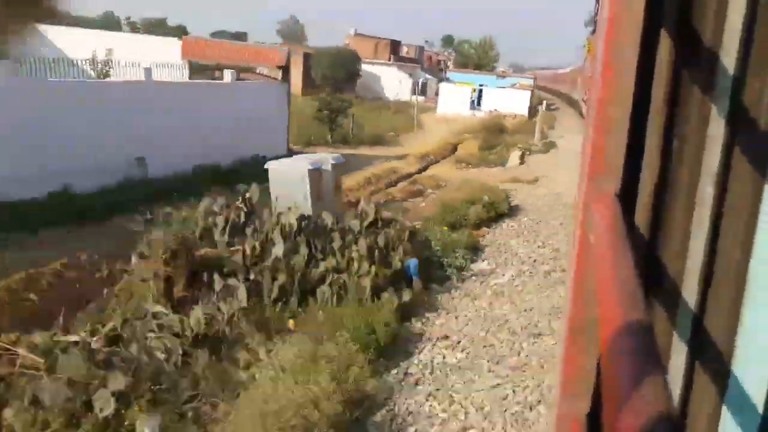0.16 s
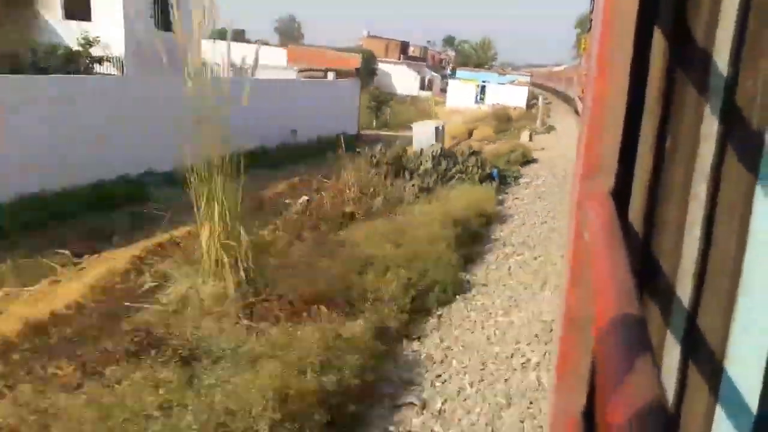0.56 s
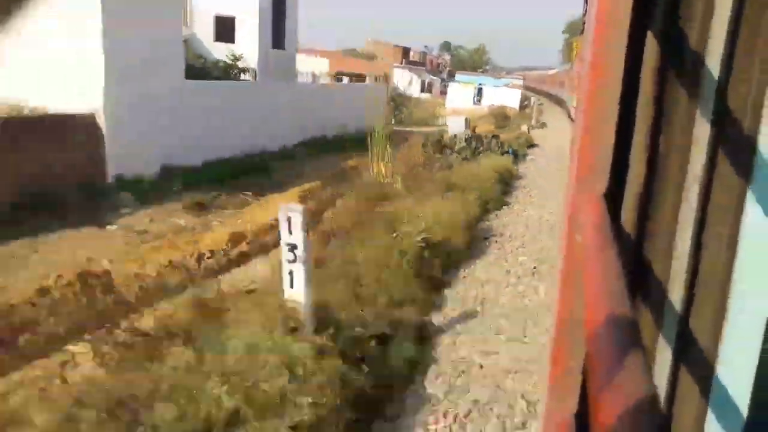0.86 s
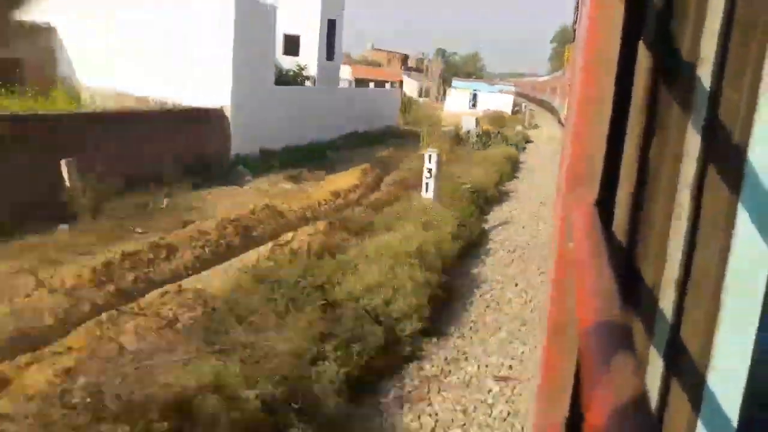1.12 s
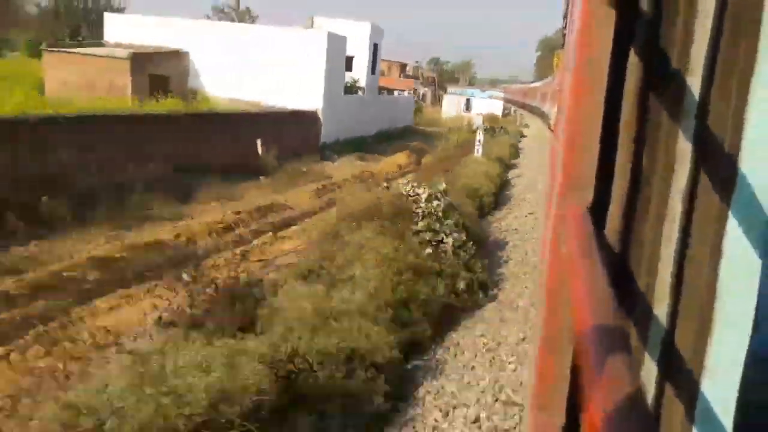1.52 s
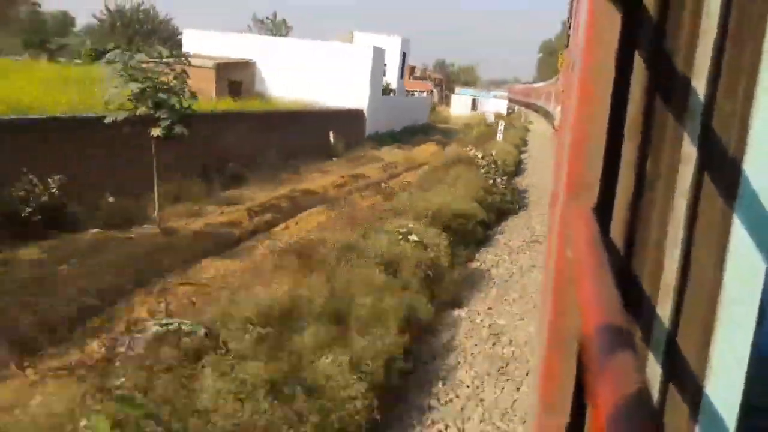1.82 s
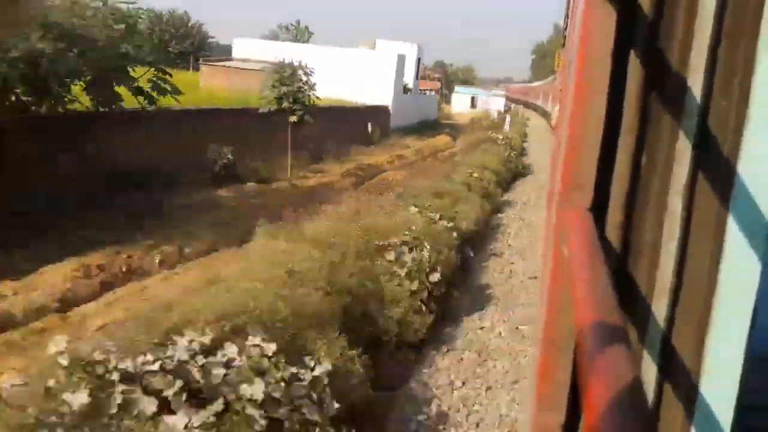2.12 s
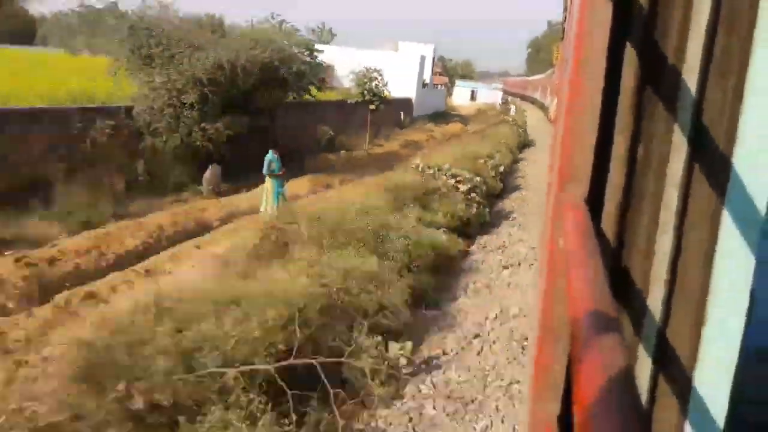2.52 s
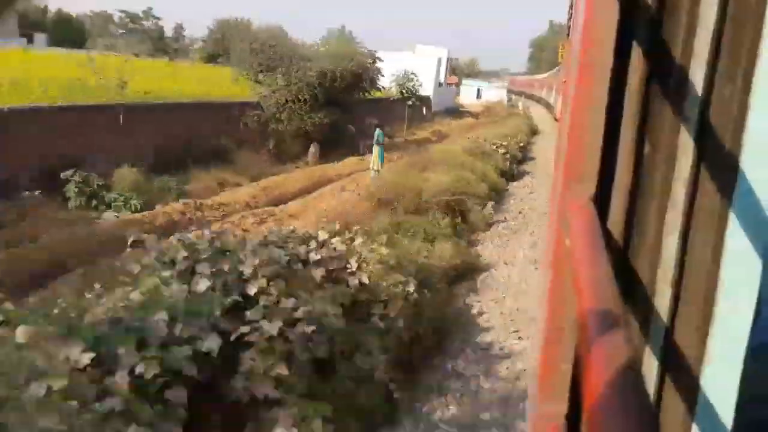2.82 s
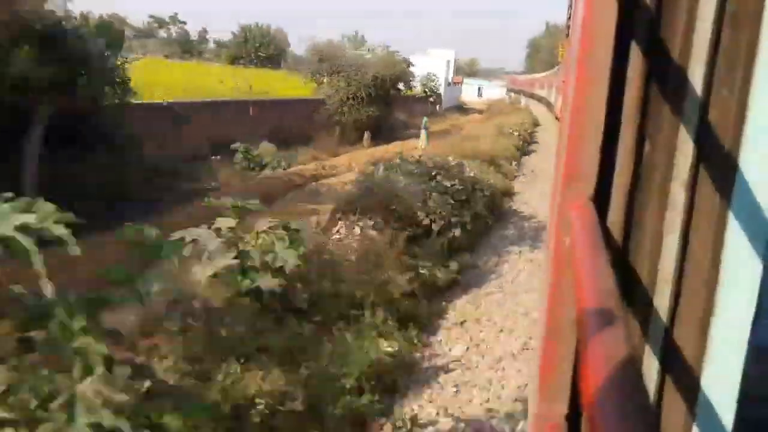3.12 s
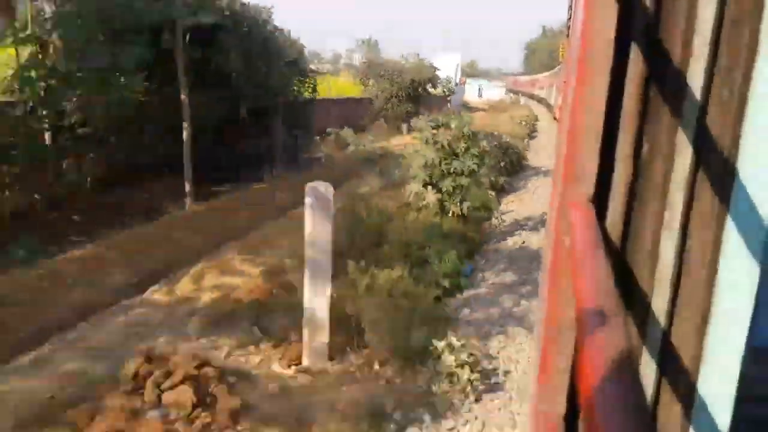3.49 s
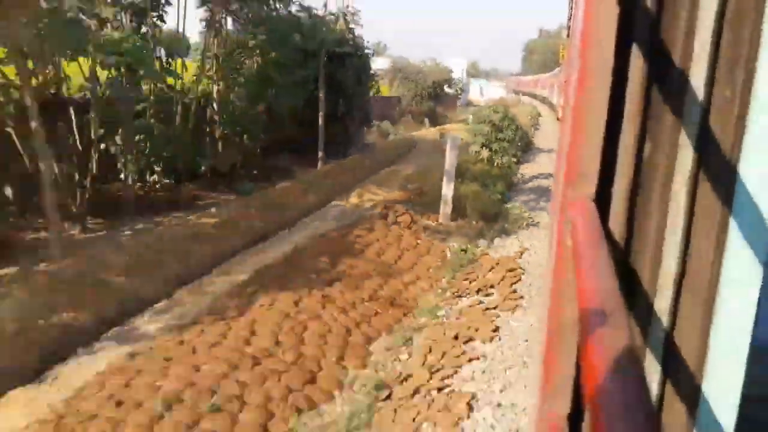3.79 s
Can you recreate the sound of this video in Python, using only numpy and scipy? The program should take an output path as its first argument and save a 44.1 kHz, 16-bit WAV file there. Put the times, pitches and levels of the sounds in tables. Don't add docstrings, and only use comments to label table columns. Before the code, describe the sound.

Buffeting wind bursts on the microphone over a low rumble and faint steady train roar

```python
import sys
import numpy as np
from scipy import signal
from scipy.fft import rfft, irfft
from scipy.io import wavfile
from scipy.ndimage import uniform_filter1d, map_coordinates

SR = 44100
rng = np.random.default_rng(int(sys.argv[2]) if len(sys.argv) > 2 else 0)


def invert_db(level):
    return 10 ** (np.asarray(level, dtype=float) / 20)


def materialize(psi):
    bounded = np.clip(np.atleast_2d(psi).T, -1, 1)
    quanta = np.round(bounded * 32767).astype(np.int16)
    wavfile.write(sys.argv[1], SR, quanta)


N = 174195


def unit(x):
    return x / np.sqrt(np.mean(x ** 2, axis=-1, keepdims=True) + 1e-20)


def along(points, hz):
    point_hz, value = np.transpose(points)
    return np.interp(np.log(hz + 1), np.log(point_hz + 1), value)


def curve(rows):
    at_s, value = np.transpose(rows)
    return np.interp(np.arange(N) / SR, at_s, value)


def wobble(rate):
    return map_coordinates(rng.standard_normal(4000), [np.arange(N) * rate / SR])


def coloured(x, gain_db):
    size = x.shape[-1]
    return irfft(rfft(x) * invert_db(gain_db(np.fft.rfftfreq(size, 1 / SR))), size)


def rush(gain_db, patchy_db):
    z = signal.stft(rng.standard_normal(N + 999), nperseg=512)[2]
    field = uniform_filter1d(rng.standard_normal(z.shape), size=5, axis=0)
    field = uniform_filter1d(field, size=8, axis=1)
    noise = signal.istft(z * invert_db(patchy_db * field / field.std()), nperseg=512)[1]
    return unit(coloured(noise, gain_db)[:N])


def shaped(x, shape):
    burst = x * shape
    gain = np.sqrt(np.mean(shape ** 2, axis=1) / np.mean(burst ** 2, axis=1))
    return burst * gain[:, None]


# centre_s, level_db, length_s, crackle_db (over the thud)
MAIN_EDDIES = [(0.629, -17.5, 0.017, -8.5), (0.748, -14.5, 0.024, -5), (0.782, -9.5, 0.018, -13.5),
               (0.799, -11, 0.0072, -18), (0.864, -10, 0.027, -6.5), (0.898, -4, 0.013, -14.5),
               (0.918, -23.5, 0.026, -10.5), (0.946, -14, 0.019, -17), (1.027, -9, 0.015, -16),
               (1.107, -14, 0.012, -13.5), (1.124, -12.5, 0.01, -17), (1.221, -7, 0.02, -9.5),
               (1.266, -11.5, 0.037, -3), (1.316, -8.5, 0.016, -9.5), (1.347, -12.5, 0.014, -17.5),
               (1.376, -13.5, 0.026, -9), (1.5, -17, 0.023, -7), (1.523, -10.5, 0.035, -4.5),
               (1.556, -14.5, 0.018, -20), (1.818, -14, 0.027, -10), (2.057, -14.5, 0.041, -10.5),
               (2.189, -16.5, 0.028, -24), (2.45, -5.5, 0.0044, -14), (2.472, -7, 0.01, -16.5),
               (2.49, -6, 0.0089, -16.5), (2.515, -11.5, 0.025, -9.5), (2.877, -6.5, 0.017, -5.5),
               (3.132, -10.5, 0.016, -10), (3.5, -12.5, 0.018, -10.5), (3.701, -10, 0.0086, -15),
               (0.041, -27, 0.0098, -23), (0.107, -24, 0.019, -11), (0.208, -23, 0.026, -21),
                 (0.306, -15.5, 0.015, -12), (0.337, -17, 0.023, -18.5), (0.39, -17, 0.035, -12),
                 (0.492, -19, 0.017, -17.5), (0.509, -15.5, 0.017, -11.5), (0.552, -14.5, 0.015, -16.5),
                 (0.689, -19.5, 0.024, -27.5), (0.823, -23.5, 0.033, -18), (1.168, -19.5, 0.0069, -7),
                 (1.592, -18, 0.016, -8), (1.687, -15, 0.0058, -14), (1.744, -19.5, 0.022, -16),
                 (1.894, -21, 0.018, -13), (2.248, -28, 0.01, -19.5), (2.378, -19.5, 0.014, -18.5),
                 (2.598, -26, 0.0075, -4), (2.625, -22, 0.007, -13.5), (2.683, -20.5, 0.0054, -3.5),
                 (2.723, -11, 0.0098, -24), (2.812, -24, 0.023, -7), (3.108, -15, 0.019, -21),
                 (3.332, -15, 0.023, -15), (3.446, -20, 0.018, -11), (3.572, -15, 0.018, -11),
                 (3.594, -17, 0.03, -11.5), (3.623, -17, 0.023, -12.5), (3.685, -22, 0.029, -17),
               (0.882, -11.5, 0.0096, -14.5),
    (1.196, -13.5, 0.017, -3.5),
    (1.241, -12, .012, -20),
    (1.293, -8.5, 0.024, -11),
    (1.54, -14, 0.0075, -15.5),
    (2.745, -15.5, 0.016, -12),
    (2.855, -16.5, 0.024, -9.5),
    (2.892, -7, 0.013, -12),
    (2.908, -12.5, 0.01, -11.5),
    (3.092, -19, 0.014, -6),
]
# centre_s, level_db, length_s
WEAK_EDDIES = [(0.063, -27, 0.021), (0.138, -25.5, 0.028), (0.231, -28, 0.017), (0.267, -29.5, 0.023),
               (0.426, -28.5, 0.022), (1.436, -34.5, 0.022), (1.633, -26, 0.007), (1.977, -23.5, 0.0097),
               (2.001, -22.5, 0.0079), (2.336, -31, 0.0067), (2.411, -24, 0.0091), (2.428, -17.5, 0.0077),
               (2.556, -25.5, 0.028), (2.959, -23.5, 0.03), (3, -21, 0.0089), (3.03, -29.5, 0.021),
               (3.175, -35, 0.043), (3.209, -34.5, 0.016), (3.239, -26.5, 0.0051), (3.283, -34, 0.015),
               (3.377, -33, 0.01), (3.414, -25, 0.04), (3.545, -21.5, 0.016), (3.8, -30, 0.0041),
               (3.833, -33, 0.0047), (3.86, -28, 0.0074), (3.87, -32, 0.013), (3.895, -22, 0.0089)]
# frequency_hz, density_db (per Hz)
THUD_COLOUR = [(20, -53.5), (40, -20), (90, 2), (200, 0), (330, -4), (800, -24), (1600, -43), (3000, -110)]
# frequency_hz, density_db (per Hz)
CRACKLE_COLOUR = [(200, -30.5), (500, 4.5), (800, -1), (1400, -8.5), (2200, -21), (3500, -37.5),
                  (5000, -52.5), (8000, -110)]


def eddies():
    weak_crackle_db = -19.5
    rows = MAIN_EDDIES
    rows = rows + [(*row, weak_crackle_db) for row in WEAK_EDDIES]
    centre_s, level_db, length_s, crackle_db = np.transpose(rows)[:, :, None]
    offset = np.arange(-2048, 2048)
    thud_noise, spit_noise, crackle_noise = rng.standard_normal((3, len(rows), len(offset)))

    def bell(spread):
        return np.exp(-(offset / SR / (spread * length_s)) ** 2)

    def crackle_gain(hz):
        slope = 0.15 * (level_db - level_db.mean()) * np.log2(1 + hz / 1000)
        return along(CRACKLE_COLOUR, hz) + slope

    spit = invert_db(3 * unit(coloured(spit_noise, lambda hz: -120 * (hz > 400))))
    thud = coloured(thud_noise * spit ** 0.5, lambda hz: along(THUD_COLOUR, hz))
    thud = shaped(thud, bell(0.44))
    crackle = shaped(coloured(crackle_noise * spit, crackle_gain), bell(0.5))
    burst = invert_db(level_db) * (thud + invert_db(crackle_db - 2) * crackle)
    at = np.round(centre_s * SR).astype(int) + offset + SR
    return np.bincount(at.ravel(), burst.ravel(), N + 2 * SR)[SR:SR + N]


# start_s, peak_db, pitch_hz
SNAPS = [(0.306, -19.5, 800), (0.476, -20, 807), (0.499, -23.5, 829), (0.512, -15.5, 705),
         (0.587, -25, 894), (0.623, -18.5, 810), (0.746, -9.5, 668), (0.776, -12.5, 756), (0.859, -10, 670),
         (0.864, -13.5, 824), (0.878, -12.5, 1160), (0.892, -10, 651), (0.916, -13, 789), (0.94, -18, 877),
         (1.114, -8.5, 1520), (1.163, -18, 684), (1.193, -6, 651), (1.218, -9.5, 1100), (1.234, -10, 651),
         (1.253, -3, 642), (1.262, -6, 875), (1.276, -14, 1360), (1.288, -3.5, 680), (1.295, -7.5, 820),
         (1.311, -11.5, 645), (1.344, -20.5, 783), (1.366, -16.5, 657), (1.377, -18, 700),
         (1.497, -15, 813), (1.52, -8, 697), (1.535, -12.5, 800), (1.596, -19.5, 738), (1.675, -21.5, 867),
         (1.724, -18, 982), (1.809, -20, 654), (1.901, -23, 711), (2.045, -19.5, 767), (2.376, -27, 767),
         (2.446, -19, 724), (2.472, -21.5, 740), (2.505, -13, 713), (2.593, -20.5, 651),
         (2.677, -24.5, 1010), (2.718, -20, 673), (2.739, -17.5, 980), (2.817, -17.5, 663),
         (2.854, -21.5, 690), (2.869, -9.5, 690), (2.887, -10, 722), (3.09, -21, 651), (3.104, -18, 940),
         (3.133, -13, 840), (3.327, -22, 794), (3.495, -11.5, 781), (3.569, -22, 797), (3.697, -23, 848)]
# frequency_hz, gain_db
RECORDER_CUT = [(20, -14), (35, -7), (60, 0), (3500, 0), (5500, -8), (8000, -60)]


def snaps():
    start_s, peak_db, pitch_hz = np.transpose(SNAPS)[:, :, None]
    life_cycles, sag, gain_db = 1.0, 0.08, -1
    t = np.arange(512) / SR
    age = t * pitch_hz / life_cycles
    phase = pitch_hz * t * np.exp(-sag * age / 2) + rng.random((len(SNAPS), 1))
    swell = age ** 2 * np.exp(2 - 2 * age)
    stroke = invert_db(peak_db + gain_db) * swell * np.sin(2 * np.pi * phase)
    at = np.round(start_s * SR).astype(int) + np.arange(len(t))
    strokes = np.bincount(at.ravel(), stroke.ravel(), N + 1)
    return coloured(strokes, lambda hz: along(RECORDER_CUT, hz))[:N]


# centre_s, level_db
RIPS = [
    (1.256, -21),
    (1.265, -23),
    (1.294, -23.5),
    (1.524, -24),
    (2.872, -28.5),
    (0.862, -29),
]


def rips():
    half_s, knee_hz, fall_db = 0.0031, 1700, 16.5
    t = np.arange(N + 1) / SR
    shape = sum(invert_db(db) * np.exp(-((t - s) / half_s) ** 2) for s, db in RIPS)

    def colour(hz):
        return -fall_db * np.abs(np.log2((hz + 1) / knee_hz))

    return (shape * unit(coloured(rng.standard_normal(N + 1), colour)))[:N]


# time_s, level_db
WIND = [
    (0.0, -28),
    (1.2, -19),
    (1.48, -27),
    (2.19, -28.5),
    (2.83, -20),
    (3.08, -28.5),
    (3.95, -30.5),
]
# frequency_hz, density_db (per Hz)
BED_COLOUR = [(20, -49), (30, -30), (86, 1.5), (200, -3), (400, -12.5), (700, -21.5), (1200, -31),
              (2500, -110)]


def turbulence():
    lumps = invert_db(4 * wobble(45) + 0.74 * wobble(11))
    rumble = unit(lumps * rush(lambda hz: along(BED_COLOUR, hz), patchy_db=1.0))
    spiky = lumps * invert_db(5.5 * wobble(220))
    spikes = rng.standard_normal(N + 1) * np.pad(spiky, (0, 1))
    flutter = unit(coloured(spikes, lambda hz: along(CRACKLE_COLOUR, hz))[:N])
    return invert_db(curve(WIND) - 0.5) * (rumble + invert_db(-10) * flutter)


# time_s, level_db, treble_db (extra)
TRAIN = [
    (0.0, -40.5, 0.5),
    (1.02, -39, 1),
    (1.51, -42, 0),
    (2.38, -44, -0.5),
    (2.78, -41.5, 2),
    (3.08, -44.5, 1),
    (3.55, -44, -0.5),
    (3.95, -45, -0.5),
]
# frequency_hz, density_db (per Hz)
ROAR_COLOUR = [(150, -7), (500, 1.5), (900, 6), (1400, -3.5), (2000, -1.5), (2650, 0.5), (3150, -2),
               (3550, -11.5)]
# frequency_hz, gain_db
ROAR_TOP = [(3550, 0), (4600, -11), (5300, -21), (6300, -22), (7400, -35.5), (7900, -45.5), (12000, -46),
            (15400, -51)]


def train():
    roar = rush(lambda hz: along(ROAR_COLOUR, hz) + along(ROAR_TOP, hz), patchy_db=1.32)
    top = coloured(np.pad(roar, (0, 1)), lambda hz: -120 * (hz < 4400))[:N]
    level_db = curve([row[:2] for row in TRAIN]) + 6
    treble_db = curve([row[::2] for row in TRAIN])
    unsteady_db = 0.26 * wobble(12) + 0.44 * wobble(32)
    return invert_db(level_db + unsteady_db) * (roar + (invert_db(treble_db) - 1) * top)


# start_s, length_s, level_db
SWISHES = [
    (0.657, 0.058, -38.5),
    (0.789, 0.054, -40),
    (1.273, 0.036, -47.5),
    (1.85, 0.033, -49),
    (2.402, 0.043, -58.5),
    (3.27, 0.022, -52),
]
# frequency_hz, density_db (per Hz)
SWISH_COLOUR = [(1500, -32), (2800, 2.5), (4000, -10), (5000, -18), (6500, -26), (8000, -48),
                (11800, -54.5), (15400, -60)]


def swishes():
    t = np.arange(N) / SR
    attack_s, release_s = 0.008, 0.012

    def edge(time_s, width_s):
        return 1 / (1 + np.exp(np.clip(-time_s / width_s, -50, 50)))

    shape = sum(invert_db(db) * edge(t - s, attack_s) * edge(s + length - t, release_s)
                for s, length, db in SWISHES)
    hiss = rush(lambda hz: along(SWISH_COLOUR, hz), patchy_db=2.5)
    return shape * invert_db(2.4 * wobble(62)) * hiss


# centre_s, half_length_s, level_db
RATTLES = [
    (.712, .022, -76.5),
    (0.831, .025, -80.5),
    (1.288, .012, -77.5),
    (1.86, .018, -83),
    (2.8, .15, -90.5),
    (3.697, .015, -89.5),
    (3.83, .01, -88),
]
# frequency_hz, density_db (per Hz)
RATTLE_COLOUR = [(7000, -30), (10000, -10), (11600, 0), (12800, -11), (15400, -16)]


def rattles():
    t = np.arange(N) / SR
    shape = sum(invert_db(db) * np.exp(-((t - s) / half) ** 2) for s, half, db in RATTLES)
    grains = rush(lambda hz: along(RATTLE_COLOUR, hz), patchy_db=-1)
    return shape * invert_db(3 * wobble(150)) * grains


def scene():
    wind = eddies() + snaps() + rips() + turbulence()
    ceiling, hardness = 0.92, 6
    wind = wind / (1 + np.abs(wind / ceiling) ** hardness) ** (1 / hardness)
    wind = coloured(np.pad(wind, (0, 1)), lambda hz: along(RECORDER_CUT, hz))[:N]
    return (wind + train() + swishes() + rattles())[None]


def band_limit(x):
    return signal.sosfilt(signal.butter(12, 15500, fs=SR, output="sos"), x)


def record(dry):
    tick_s, tick_db = 1.2632, -31
    offset = np.arange(N) - round(tick_s * SR)
    tick = invert_db(tick_db) * np.exp(-offset ** 2 / 2.6)
    return band_limit(dry - tick)


dry = scene()
out = record(dry)
materialize(out)
```